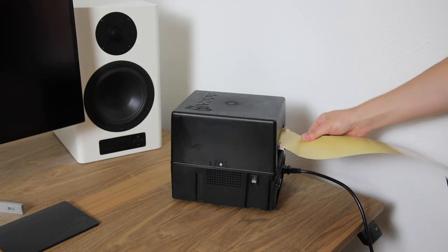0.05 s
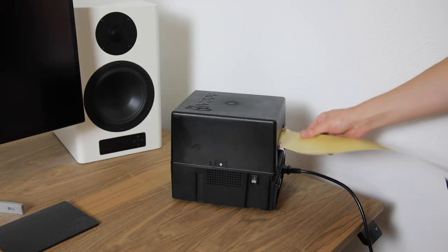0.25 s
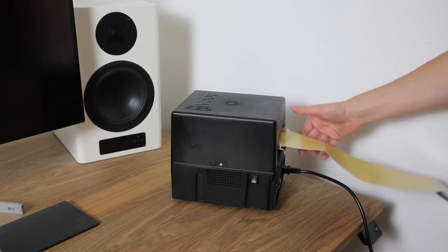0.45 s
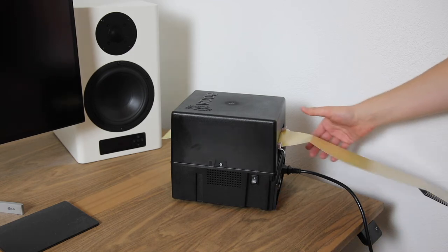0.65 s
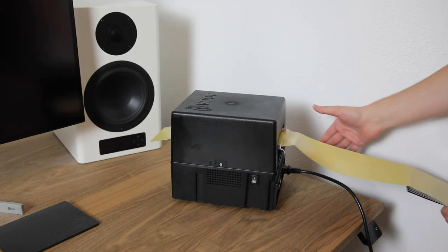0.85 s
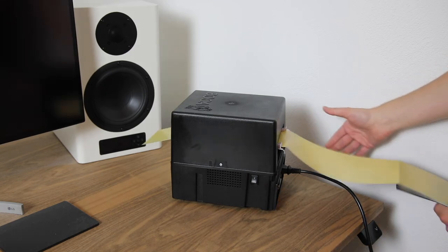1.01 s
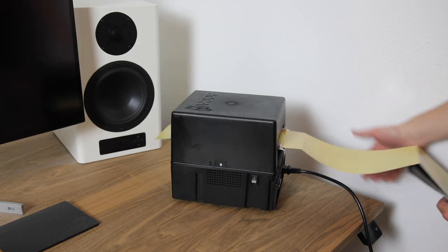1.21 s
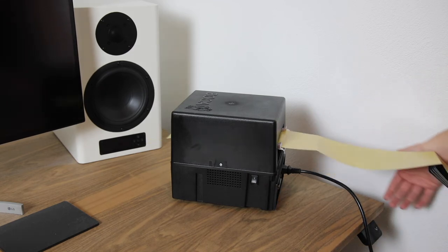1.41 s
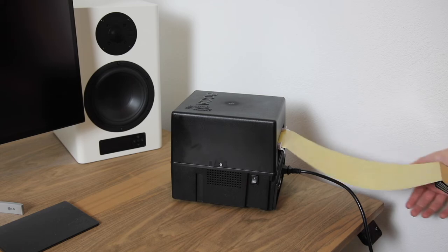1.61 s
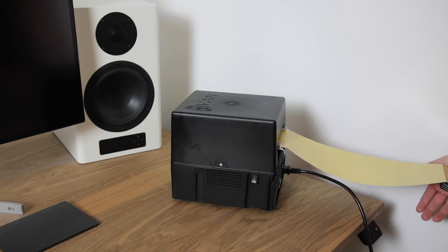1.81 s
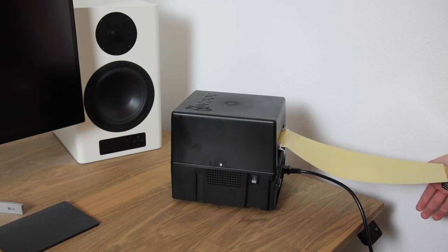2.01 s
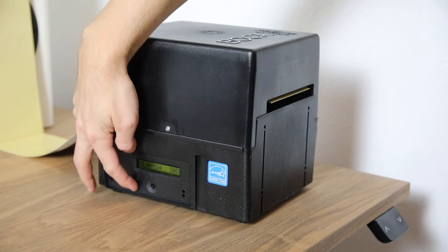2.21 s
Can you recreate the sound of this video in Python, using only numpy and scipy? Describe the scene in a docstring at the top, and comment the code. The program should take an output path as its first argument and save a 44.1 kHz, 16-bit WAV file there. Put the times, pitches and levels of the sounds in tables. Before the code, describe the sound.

A ticket printer, heard up close in a quiet room, grabs a paper strip with a quick clatter at about 0.2 seconds. Its motor whines steadily over whirring gears and softly sliding paper, with clunks near 0.5, 0.9 and 1.1 seconds. After a faint scrape at 1.6 seconds, the motor brakes with a judder that fades by 2 seconds. A very faint hiss joins the room tone at 2.2 seconds.

```python
"""A ticket printer on a wooden desk in a quiet room, heard from close by on one microphone.
The feed grabs a paper strip with a clatter. The stepper motor whines over whirring gears and sliding
paper while the mechanism clunks in its plastic case. The strip scrapes its guide, the motor brakes
to a juddering stop, and a soft hiss comes up at the end."""
import sys
import numpy as np
from scipy import signal
from scipy.fft import rfft, irfft, next_fast_len
from scipy.io import wavfile

SR = 44100
rng = np.random.default_rng(int(sys.argv[2]) if len(sys.argv) > 2 else 0)


def unload_audio(sound):
    """Save the sound as a 16-bit wav file, at the path given as the first command line argument."""
    columns = np.transpose(np.atleast_2d(sound))
    # keep every value between -1 and 1, then stretch to whole-number steps
    steps = np.round(np.clip(columns, -1, 1) * 32767)
    wavfile.write(sys.argv[1], SR, steps.astype(np.int16))


N = 103635
T = np.arange(N) / SR
MOTOR_START_S, MOTOR_RISE_S, MOTOR_STOP_S = .235, .02, 1.644


def from_db(db):
    """Decibels to gain."""
    return 10 ** (np.asarray(db) / 20)


def rms_one(x):
    """Scale to rms 1."""
    return x / np.sqrt(np.mean(x ** 2) + 1e-20)


def in_time(rows):
    """The columns of a curve at every sample; its first column is time."""
    time_s, *columns = np.transpose(rows)
    return [np.interp(T, time_s, column) for column in columns]


def swell(start_s, rise_s):
    """Gain 0 until start_s, then rising towards 1."""
    return 1 - np.exp(-np.maximum(T - start_s, 0) / rise_s)


def dying(start_s, t60_s):
    """Gain 1 until start_s, then an exponential decay."""
    return from_db(-60 * np.maximum(T - start_s, 0) / t60_s)


def running(t60_s):
    """On while the motor turns, then dying away."""
    return np.clip((T - MOTOR_START_S) / MOTOR_RISE_S, 0, 1) * dying(MOTOR_STOP_S, t60_s)


def drift(rate_hz):
    """A random wander of rms 1, mostly slower than rate_hz."""
    hop, settle = 40, 2000
    pole = np.exp(-2 * np.pi * rate_hz * hop / SR)
    white = rng.standard_normal(N // hop + settle + 2)
    slow = signal.lfilter([1], [1, -2 * pole, pole * pole], white)[settle:]
    return np.interp(np.arange(N) / hop, np.arange(len(slow)), rms_one(slow))


def cut(x, kind, corner_hz):
    """Second-order "low" or "high" pass."""
    return signal.sosfilt(signal.butter(2, corner_hz, kind, fs=SR, output="sos"), x)


def colour(x, spectrum):
    """Causal filter of unit power gain, shaped by rows of freq_hz, relative_db."""
    size = 2 * next_fast_len(N)
    hz, db = np.transpose(spectrum)
    bin_hz = np.arange(size // 2 + 1) * SR / size
    gain = rms_one(from_db(np.interp(np.log(bin_hz + 1), np.log(hz), db)))
    cepstrum = irfft(np.log(gain))
    cepstrum[1:size // 2] *= 2  # fold to minimum phase
    cepstrum[size // 2 + 1:] = 0
    return irfft(rfft(x, size) * np.exp(rfft(cepstrum)))[:N]


def noise(spectrum):
    """Coloured noise of rms about 1."""
    return colour(rng.standard_normal(N), spectrum)


def blows(start_s, level_db, spectrum, t60_s, click, rise_s):
    """Each blow is a sharp click and a fast-dying rattle of dense modes."""
    power = sum((from_db(db) * swell(s, rise_s) * dying(s, t60_s)) ** 2
                for s, db in zip(start_s, level_db))
    rattle = rng.standard_normal(N) * np.sqrt(power)
    rattle[((start_s + rise_s) * SR).astype(int)] += click * from_db(level_db)
    return colour(rattle, spectrum)


def ringing(start_s, level_db, modes):
    """Every blow strikes each mode (pitch_hz, gain_db, t60_s) with a strength of its own."""
    out = 0
    scatter_db = rng.standard_normal((len(start_s), len(modes))).T
    for (hz, db, t60_s), own_db in zip(modes, scatter_db):
        clicks = np.full(N, 1e-18)
        clicks[(start_s * SR).astype(int)] = from_db(level_db + db + own_db) * np.sign(own_db)
        pole, angle = from_db(-60 / (t60_s * SR)), 2 * np.pi * hz / SR
        out = out + signal.lfilter([0, np.sin(angle)], [1, -2 * pole * np.cos(angle), pole ** 2], clicks)
    return out


def room(x):
    """Diffuse reflections reach the microphone just after the direct sound."""
    split_hz, delay_s = 3460, .0056
    white = rng.standard_normal(N)
    low = cut(white, "low", split_hz) * dying(0, t60_s=.3)
    high = cut(white, "high", split_hz) * dying(0, t60_s=.31)
    tail = (low - high) * (T > delay_s)
    return signal.fftconvolve(x, rms_one(tail) / np.sqrt(N))[:N]


def background():
    """Quiet room tone; a soft hiss joins it at the end."""
    # spectrum of the room tone: freq_hz, relative_db
    room_tone = [(20, -9), (150, -2.5), (470, -1.5), (1200, -5.5), (3000, -9.5), (5300, -20.5),
                 (12000, -14.5), (16000, -15.5)]
    # spectrum of the hiss: freq_hz, relative_db
    hiss = [(220, -20), (310, -2), (530, -15), (1200, -9), (2700, -14), (5000, -25.5), (15500, -26)]
    return from_db(-62.5) * noise(room_tone) + from_db(-58) * noise(hiss) * swell(2.214, rise_s=.0016)


def rumble():
    """The case and the desk rumble under load and boom as the motor brakes."""
    # spectrum of case and desk: freq_hz, relative_db
    spectrum = [(30, -46), (120, -13), (155, 2.5), (190, -1.5), (260, -18), (800, -68)]
    # course of the rumble: time_s, level_db
    levels = [(.3, -48), (.6, -48), (.72, -64.5), (.86, -64.5), (.92, -55), (1.04, -65), (1.18, -50),
              (1.38, -56), (1.62, -56.5), (1.73, -48), (1.86, -61.5), (2.05, -79)]
    level_db, = in_time(levels)
    return from_db(level_db) * swell(MOTOR_START_S, MOTOR_RISE_S) * noise(spectrum)


def scrape():
    """The strip rasps briefly against its guide just before the stop."""
    # spectrum of the rasp: freq_hz, relative_db
    spectrum = [(1500, -42), (2400, 11), (3200, -2), (4800, -28)]
    peak_s, peak_db, width_s = 1.622, -41, .01
    return from_db(peak_db) * np.exp(-((T - peak_s) / width_s) ** 2) * noise(spectrum)


def gears(phase):
    """The gear teeth whirr, pulsing in time with the motor's steps."""
    # spectrum of the gear train: freq_hz, relative_db
    spectrum = [(70, -45), (220, -13.5), (300, -0.5), (365, 13.5), (430, -1), (610, 18), (800, 0),
                (1200, 5.5), (1500, -1), (2300, 2.5), (3000, -4), (5000, -18.5), (12000, -50.5)]
    # course of the whirr: time_s, level_db
    levels = [(.3, -28), (.6, -40), (1.02, -43.5), (1.2, -39), (1.36, -40), (1.5, -39.5), (1.68, -36)]
    level_db, = in_time(levels)
    pulsing = 1 + .29 * np.sin(phase)
    teeth = rms_one(rng.standard_normal(N) * pulsing * from_db(1.4 * drift(46)))
    return from_db(level_db) * colour(teeth, spectrum) * running(t60_s=.58)


def paper():
    """Paper fibres slide through the guide with a grainy hiss."""
    # spectrum of sliding paper: freq_hz, relative_db
    spectrum = [(2000, -4), (3600, 2.5), (5200, -3.5), (6900, 1.5), (8300, -1), (10200, 1), (12200, -5),
                (15500, -22.5)]
    # course of the sliding: time_s, level_db
    levels = [(.3, -47), (.58, -54), (.66, -48), (1.04, -54.5), (1.31, -50.5), (1.39, -54), (1.51, -49),
              (1.6, -54)]
    level_db, = in_time(levels)
    fibres = rms_one(rng.standard_normal(N) * from_db(1.8 * drift(120)))
    return from_db(level_db) * colour(fibres, spectrum) * running(t60_s=.58)


def braking():
    """The slowing motor judders through the main resonance of the case; the room carries it on."""
    # the falling judder: time_s, pitch_hz, level_db
    judder = [(1.645, 390, -39), (1.678, 382, -22.5), (1.712, 372, -19.5), (1.73, 350, -30),
              (1.785, 348, -35), (1.815, 345, -54)]
    jitter_rad, rough_db = .17, 1.6
    pitch_hz, level_db = in_time(judder)
    gate = (T > judder[0][0]) * (T < judder[-1][0])
    phase = 2 * np.pi * np.cumsum(pitch_hz) / SR + jitter_rad * drift(78)
    direct = gate * from_db(level_db + rough_db * drift(56)) * np.sin(phase)
    return direct + from_db(-8) * room(direct)


def clunks():
    """Each clunk of the mechanism is a knock followed by a dull thud and the ring of the case."""
    # the clunks: start_s, knock_db, thud_db, ring_db
    hits = [(.315, -28, -41, -19.5), (0.477, -14.5, -26, -15), (0.8745, -26.5, -36.5, -31),
            (1.066, -34, -21, -42), (1.078, -18.5, -23.5, -28), (1.118, -32, -25, -25),
            (1.273, -33.5, -32.5, -27), (1.648, -34, -31.5, -29), (1.672, -33, -33, -25.5)]
    # spectrum of a knock: freq_hz, relative_db
    knock = [(60, -44.5), (250, -19), (600, 4.5), (800, -3), (970, 5.5), (1150, 3), (1350, 5.5), (1850, 5),
             (2450, -12), (4000, -21), (15000, -69.5)]
    # spectrum of a thud: freq_hz, relative_db
    thud = [(30, -77), (75, -22), (130, -17.5), (240, -13.5), (310, -1.5), (390, 2), (500, -5), (660, -6),
            (850, -17), (4000, -77)]
    # modes of the plastic case: pitch_hz, gain_db, t60_s
    case_modes = [(286, -34, 0.18), (356.1, -5, 0.23), (381.7, 0.5, 0.23), (462, -13.5, 0.47),
                  (1040, -11, 0.094), (1290, -21, 0.32)]
    echo_s, thud_rise_s = .02, .00841
    start_s, knock_db, thud_db, ring_db = np.transpose(hits)
    impacts = blows(start_s, knock_db, knock, t60_s=.034, click=6.9, rise_s=.00066)
    impacts += from_db(-12) * np.interp(T - echo_s, T, impacts)  # a wall throws each knock back
    impacts += blows(start_s, thud_db, thud, t60_s=.27, click=5.8, rise_s=thud_rise_s)
    ring = cut(ringing(start_s + thud_rise_s, ring_db, case_modes), "high", 170)
    return impacts + ring + from_db(-3) * room(impacts)


def clatter():
    """A quick uneven run of hard blows as the feed grabs the strip, then latches."""
    # blows of the feed: start_s, clack_db, snap_db
    hits = [(.229, -21, -34.5), (0.2391, -8, -28), (.246, -18, -22.5), (.255, -10.5, -25.5),
            (0.262, -18, -34.5), (0.2708, -11, -28), (0.2838, -12.5, -23), (0.297, -15, -30.5),
            (0.3023, -25, -24.5), (.3075, -15.5, -25.5), (0.327, -18.5, -33), (.346, -22.5, -39),
            (0.377, -23.5, -52), (.479, -21.5, -31)]
    # spectrum of a clack: freq_hz, relative_db
    clack = [(30, -63), (80, -24.5), (170, -13.5), (290, 1), (620, 4.5), (870, -13), (1100, 0), (1800, -5),
             (2650, -14), (3300, -19.5), (5000, -28), (15000, -57.5)]
    # spectrum of a bright snap: freq_hz, relative_db
    snap = [(1500, 0), (3800, 5), (5200, -6), (6500, 1.5), (7600, 3.5), (8500, -6.5), (10300, 2.5),
            (13500, -9), (16000, -19.5)]
    # modes of the feed mechanism: pitch_hz, gain_db
    feed_modes = [(703, -14), (800, -15.5), (1065, -16.5), (1353, -16.5), (1977, -19.5), (2223, -19),
                  (2490, -14.5), (2720, -18.5), (6320, -29)]
    ring_t60_s = .12
    start_s, clack_db, snap_db = np.transpose(hits)
    impacts = blows(start_s, clack_db, clack, t60_s=.042, click=5.16, rise_s=.0008)
    impacts += blows(start_s, snap_db, snap, t60_s=.04, click=4, rise_s=.0005)
    ring = ringing(start_s, clack_db, [(hz, db, ring_t60_s) for hz, db in feed_modes])
    return impacts + ring + from_db(-4.5) * room(impacts)


def step_phase():
    """The motor's phase in radians, one cycle a step, with slight jitter."""
    # speed of the motor: time_s, step_hz
    step_rate = [(.47, 585.6), (.5, 583.3), (1.06, 583.4), (1.085, 576), (1.12, 584), (1.2, 586.4)]
    step_hz, = in_time(step_rate)
    return 2 * np.pi * np.cumsum(step_hz) / SR + .012 * drift(30)


def stepper(phase):
    """The motor whines at the step rate, overtones fluttering; it dips and chirps as the rotor slips."""
    # the whine as the load changes: time_s, fundamental_db, octave_db
    whine_levels = [(.33, -26.5, -44), (.53, -25.5, -44.5), (.6, -21, -48.5), (.68, -29, -52.5),
                    (.8, -27.5, -54.5), (.87, -25.5, -52), (.93, -22, -35.5), (.99, -21.5, -40),
                    (1.03, -26, -55), (1.14, -27.5, -51), (1.22, -27, -42), (1.35, -30.5, -55),
                    (1.44, -29.5, -44), (1.46, -26.5, -45), (1.5, -28, -42), (1.6, -24, -37),
                    (1.645, -30.5, -44), (1.675, -9, -28.5), (1.705, -61, -57)]
    # thin whine at four times the step rate: time_s, level_db
    upper_levels = [(.92, -63), (.99, -49), (1.09, -57), (1.14, -45.5), (1.22, -45.5), (1.3, -59),
                    (1.46, -54), (1.52, -44), (1.57, -66)]
    # faint overtones: step_rate_multiple, level_db
    overtones = [(3, -56), (6, -60), (7, -63)]
    slips_s, slip_width_s, slip_depth = (1.448, 1.593), .0035, .7
    sag_s, sag_width_s, sag_depth_hz = .985, .028, 22
    fundamental_db, octave_db = in_time(whine_levels)
    upper_db, = in_time(upper_levels)
    dips, wobble_rad = 1, .36 * drift(18)
    for s in slips_s:  # the rotor stumbles and catches up one cycle
        phase = phase + np.pi * (1 + np.tanh((T - s - slip_width_s) / (2 * slip_width_s)))
        dips = dips * (1 - slip_depth * np.exp(-((T - s) / slip_width_s) ** 2))
    sag_hz = sag_depth_hz * np.exp(-((T - sag_s) / sag_width_s) ** 2)  # the octave bends down under load
    whine = from_db(fundamental_db + .3 * drift(25)) * np.sin(phase)
    whine += from_db(octave_db) * np.sin(2 * phase - 2 * np.pi * np.cumsum(sag_hz) / SR + wobble_rad)
    whine += from_db(upper_db) * np.sin(4 * phase + 2 * wobble_rad)
    whine += from_db(-54 + 2 * drift(28)) * np.sin(phase / 2 + drift(6.1))  # the case hums an octave down
    for multiple, db in overtones:
        whine += from_db(db + drift(6)) * np.sin(multiple * phase + 2 * wobble_rad)
    return np.sqrt(2) * whine * dips * running(t60_s=.18)


def scene():
    """The printer and the room as they reach the microphone, in mono."""
    phase = step_phase()
    printer = clatter() + clunks() + stepper(phase) + braking() + gears(phase) + paper()
    return (printer + rumble() + scrape() + background())[None]


def record(dry):
    """The microphone's low cut and a steep cut of the top."""
    low_cut_hz, top_cut_hz = 55, 15600
    top_cut = signal.ellip(12, .1, 80, top_cut_hz, fs=SR, output="sos")
    return signal.sosfilt(top_cut, cut(dry, "high", low_cut_hz))


dry = scene()
out = record(dry)
unload_audio(out)
```